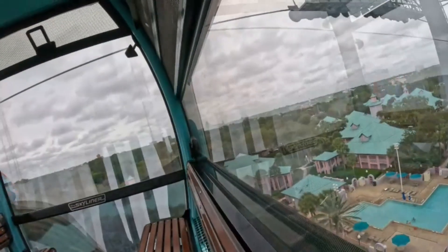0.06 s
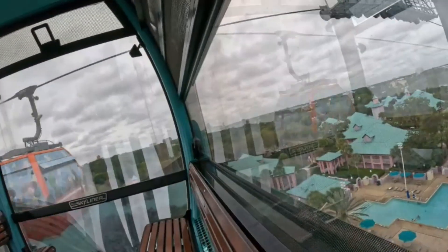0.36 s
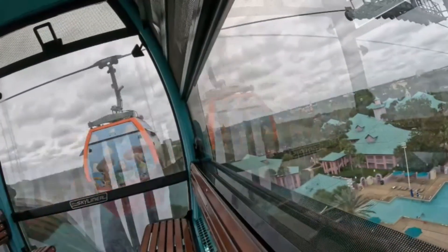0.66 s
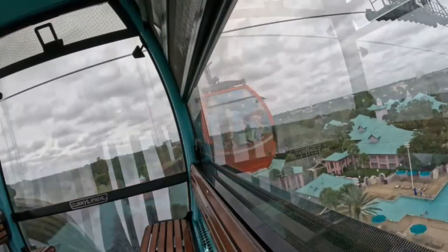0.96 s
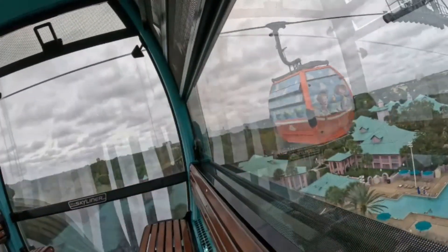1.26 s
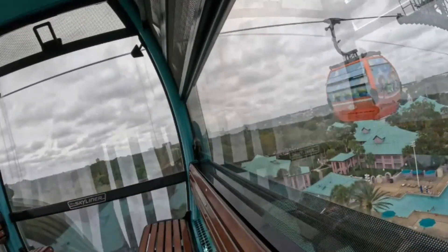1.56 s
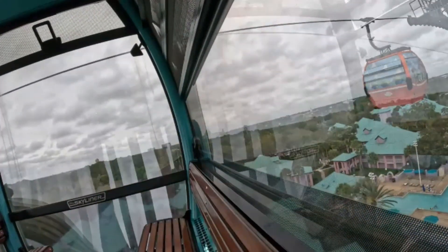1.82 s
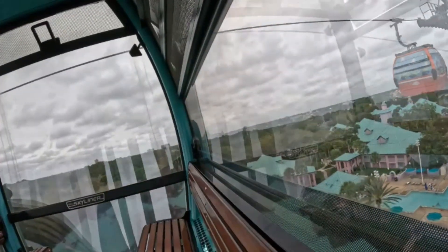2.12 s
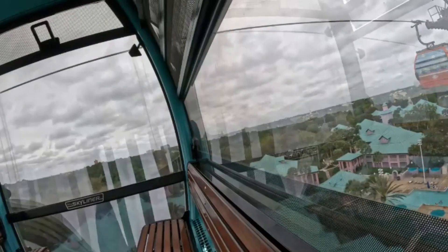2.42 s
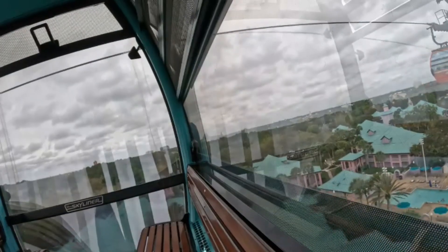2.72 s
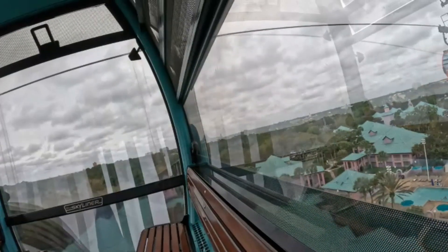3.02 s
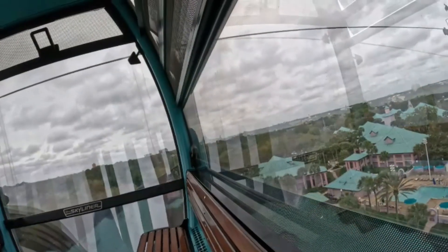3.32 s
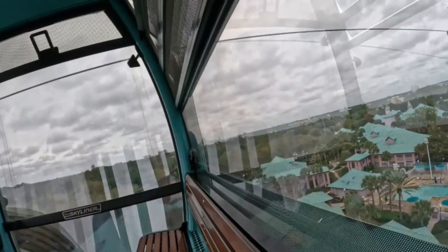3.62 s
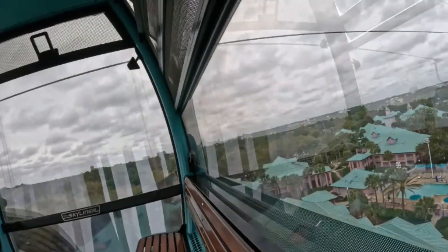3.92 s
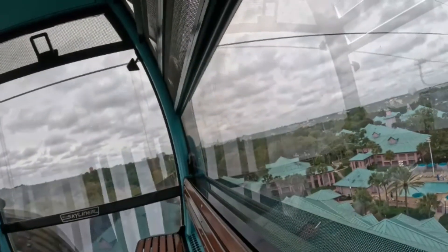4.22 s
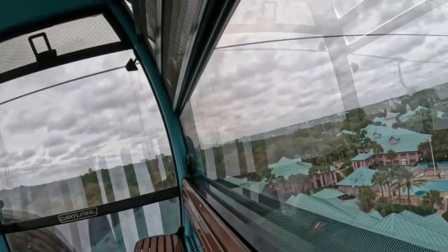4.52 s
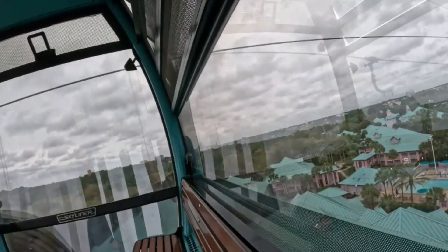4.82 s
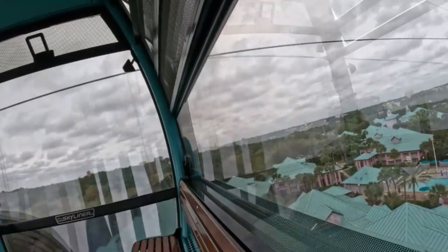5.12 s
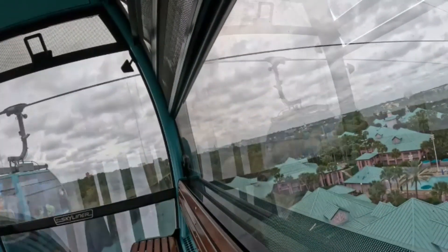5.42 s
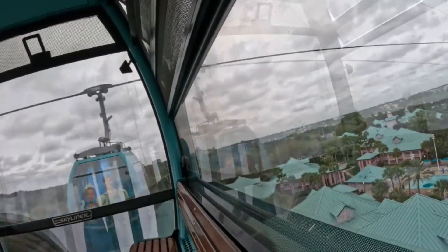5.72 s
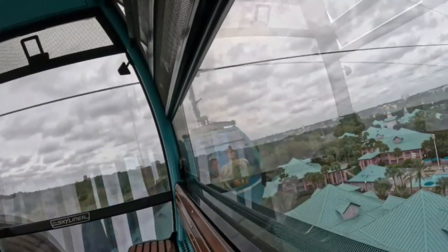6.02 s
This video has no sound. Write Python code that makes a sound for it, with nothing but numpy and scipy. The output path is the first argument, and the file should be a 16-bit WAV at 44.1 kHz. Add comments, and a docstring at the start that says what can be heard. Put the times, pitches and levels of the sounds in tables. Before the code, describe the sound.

Heard from a seat inside a closed cable gondola, a steady deep rumble and swelling hum dominate, with air rushing faintly behind the windows. The shell gives soft, low thumps with tiny ticks in clusters at the beginning, the middle and the end. An oncoming cabin slips by, barely audible, early on. Later a fitting scrapes and squeaks quietly several times, and two very faint whistles come and go.

```python
"""Inside a gliding gondola

The twisted haul rope runs over the sheaves of a receding tower and sends a low, swelling drone down
the hanger. The cabin responds as a resonator: its shell booms and thumps softly, with faint ticks,
and its panels ring. Air rushes outside, another cabin passes, a fitting rubs now and then,
and two faint whistles come and go."""
import sys
import numpy as np
from scipy import signal
from scipy.fft import rfft, irfft
from scipy.io import wavfile

SR = 44100
rng = np.random.default_rng(int(sys.argv[2]) if len(sys.argv) > 2 else 0)


def persist_wave(psi):
    """Save psi, clipped to +-1, as 16-bit WAV."""
    counts = np.round(np.clip(psi, -1, 1) * 32767).astype(np.int16)
    wavfile.write(sys.argv[1], SR, np.atleast_2d(counts).T)


N = 272097
TIME = np.arange(N) / SR
FREQS = np.maximum(np.arange(N // 2 + 1) * SR / N, 1)

# fundamental of the rope's drone: t/s, level/dB
FUNDAMENTAL = [(0.06, -19.5), (0.46, -26), (0.73, -19.5), (2.01, -18.5), (2.51, -27), (2.63, -21),
               (2.94, -20.5), (3.0, -22.5), (3.34, -19.5), (3.56, -25.5), (3.94, -15), (4.28, -27),
               (4.6, -19), (4.95, -21.5), (5.46, -18.5), (5.64, -24.5), (5.9, -17), (6.1, -19.5)]
# its third harmonic: t/s, level/dB
THIRD_HARMONIC = [(0.04, -50.5), (0.85, -40.5), (1.15, -52.5), (1.33, -41.5), (1.6, -35.5), (1.75, -53),
                  (1.88, -42), (2.06, -51.5), (2.5, -41), (2.8, -34.5), (3.0, -41.5), (3.2, -51.5),
                  (3.38, -34), (3.47, -42.5), (3.58, -32.5), (3.7, -50.5), (3.79, -39), (4.2, -51),
                  (4.36, -35.5), (4.54, -48), (4.63, -37), (5.1, -43.5), (5.37, -59), (5.46, -35.5),
                  (5.7, -43.5), (6.12, -41.5)]
# its weak overtones: harmonic number, level/dB
OVERTONES = [(2, -60), (4, -61), (5, -60)]
# dips of the drone at jolts: t/s, half-length/s, fraction lost
STUTTERS = [(0.263, 0.017, 0.77), (0.333, 0.013, .45), (3.055, 0.014, 0.7), (3.213, 0.016, 0.37),
            (5.924, 0.012, 0.4)]
# spectrum of the shell's boom: f/Hz, relative density/dB
BOOM_SPECTRUM = [(8, -19), (18, -1), (30, 1), (62, -6), (80, -6.5), (100, -9), (130, -9.5), (165, -18.5),
                 (230, -24), (400, -46.5)]
# envelope of the panels' vibration: t/s, relative level/dB
PANEL_ENVELOPE = [(0, -35), (.35, -37.5), (.95, -41), (1.45, -40.5), (2.5, -42), (3.6, -43), (4.2, -44),
                  (5.0, -39), (6.1, -44)]
# spectrum of their rumble: f/Hz, relative density/dB
PANEL_SPECTRUM = [(80, -13.5), (140, -1.5), (205, 3), (280, 1), (330, 1), (375, -7), (470, -10),
                  (560, -11.5), (720, -19), (1000, -30), (2000, -41.5)]
# their modes: f/Hz, bandwidth/Hz, level/dB re the envelope
PANEL_MODES = [(203.4, 14, -12.5), (311, 26, -15), (397.6, 6, -13), (426.4, 8, -14), (505, 33, -20),
               (617.7, 11, -21), (747, 61, -23.5)]
# surging hum of one panel: t/s, relative level/dB
PANEL_HUM = [(0, -61), (.16, -41), (.45, -43), (.58, -55), (.72, -37.5), (.9, -55.5), (1.15, -40.5),
             (1.38, -50), (1.55, -43.5), (1.78, -50.5), (1.9, -38.5), (2.1, -48.5), (2.76, -45.5),
             (3.15, -58.5), (3.36, -44.5), (3.62, -46.5), (3.8, -52.5), (4.55, -59), (4.98, -41.5),
             (5.22, -58), (5.64, -46.5), (6.1, -58.5)]
# air along the windows: t/s, relative level/dB
AIR_ENVELOPE = [(0, -59), (.85, -59), (1.9, -60.5), (2.6, -59), (3.2, -56), (4.15, -59.5), (4.55, -57),
                (5.2, -59), (6.1, -57)]
# its spectrum behind the glazing: f/Hz, relative density/dB
AIR_SPECTRUM = [(250, -5), (550, 2.5), (900, 2.5), (1100, 0), (1400, -3.5), (2000, -7.5), (2700, -12),
                (3500, -14.3), (4300, -22), (5200, -24.5), (6800, -30.5), (7600, -36), (8400, -44.5),
                (9200, -66)]
# surges of the vent's resonance: t/s, half-length/s, level/dB
VENT_SURGES = [(2.93, .08, -59), (3.27, 0.08, -58), (3.785, .06, -52.5), (4.365, .04, -54),
               (4.525, .033, -53), (6.0, .17, -60)]
# resonances of the tower's wheels: f/Hz, bandwidth/Hz, relative level/dB
SHEAVE_MODES = [(420.3, 10, -2.5), (475, 42, -4), (657, 130, -8.5)]
# thumps of the shell: t/s, peak level/dB, f/Hz
THUMPS = [(0.102, -19, 109), (0.293, -20, 42), (0.354, -16, 58), (0.44, -25, 45), (0.585, -20, 45.7),
          (1.175, -29, 125), (2.02, -28, 121.5), (2.59, -25.5, 42), (3.041, -15.5, 58), (3.058, -23, 124.6),
          (3.206, -18, 40.2), (3.252, -20, 107.4), (3.298, -24, 44), (3.848, -24.5, 131.6),
          (5.102, -20, 45.3), (5.138, -21.5, 111), (5.298, -21.5, 128.7), (5.771, -23, 44),
          (5.842, -20.5, 50.2), (5.903, -19.5, 124.7), (5.922, -19, 45.2)]
# modes of a thump: frequency ratio, relative level/dB, half-length/cycles
SHELL_MODES = [(1, 1, 0.91), (2.098, -12.5, 1.9)]
# bursts of ticks at some jolts: t/s, half-length/s, gain/dB
TICK_BURSTS = [(.11, .011, -55), (.29, .006, -59), (.35, .012, -63), (3.205, .011, -59), (5.1, .007, -54.5),
               (5.902, 0.012, -56.5)]
# swells of the lower whistle: t/s, half-length/s, level of its tone/dB
LOW_WHISTLE = [(.5, 0.098, -81), (2.02, 0.17, -75.5), (3.05, .22, -76.5), (3.87, 0.16, -73),
               (4.68, 0.2, -68.5)]
# swells of the higher whistle: t/s, half-length/s, level/dB
HIGH_WHISTLE = [(5.13, .08, -78.5), (5.3, .13, -81.5), (5.68, 0.2, -86), (6.08, 0.19, -86)]
# whoosh of the oncoming cabin: f/Hz, bandwidth/Hz, relative level/dB
WHOOSH_BANDS = [(2020, 200, -6), (3570, 410, -8), (4700, 900, -16)]
# rubs of a fitting: t/s, length/s, relative level/dB, squeak/dB re the rub, relative grit level/dB
RUBS = [(2.853, 0.15, -49.5, -2, -70), (3.304, 0.11, -58, -14, -73), (3.702, 0.19, -51, -10.5, -96),
        (4.306, 0.086, -55.5, 0, -79), (4.451, 0.094, -56, 2.5, -77)]
# spectrum of its dry scrape: f/Hz, relative density/dB
SCRAPE_SPECTRUM = [(700, -7), (900, -2.5), (985, 2.5), (1100, 1), (1450, -11), (1800, -3), (2250, -4.5),
                   (2700, -11), (4500, -22), (7000, -36), (8700, -40), (10000, -62)]
# spectrum of the grit as it breaks loose: f/Hz, relative density/dB
GRIT_SPECTRUM = [(2500, -7.5), (5500, 3.5), (7500, -0.5), (9300, -9), (10600, -26), (11700, -14),
                 (13100, -13), (14300, -35)]
# its modes: f/Hz, waver rate/Hz, relative level/dB, rise time as a fraction of the scrape's rise time, extra
# growth/(dB/dB)
SQUEAK_MODES = [(1755, 34, 3, 0.44, 0), (1980, 46, -9.5, 1.0, 1.8), (4990, 140, -15, 0.85, 2)]


def undb(db):
    """Amplitude grows tenfold for every 20 dB."""
    return 10 ** (np.asarray(db) / 20)


def envelope(table):
    """Linear interpolation gives the level in dB at every sample."""
    return np.interp(TIME, *np.transpose(table))


def swell(centre_s, half_s):
    """A Gaussian pulse falls to 1/e one half-length from its centre."""
    return np.exp(-((TIME - centre_s) / half_s) ** 2)


def swells(table):
    """Gaussian pulses superpose into one gain curve."""
    return sum(undb(db) * swell(centre, half) for centre, half, db in table)


def strike(start_s, rise_s):
    """A critically damped response rises quickly to 1 and falls more slowly."""
    age = np.maximum(TIME - start_s, 0) / rise_s
    return age * np.exp(1 - age)


def noise(gain):
    """Filtered white noise takes the filter's spectrum; rms 1."""
    x = irfft(rfft(rng.standard_normal(N)) * gain, N)
    return x / np.std(x)


def coloured(spectrum):
    """Spectral shaping: noise follows the listed points and rolls off beyond them; rms 1."""
    hz, db = np.transpose(spectrum)
    skirts = np.minimum(FREQS / hz[0], 1) * np.minimum(hz[-1] / FREQS, 1) ** 3
    return noise(undb(np.interp(np.log(FREQS), np.log(hz), db)) * skirts)


def ring(hz, width):
    """A randomly driven resonator passes a narrow band; rms 1."""
    return noise(1 / (1 + ((FREQS - hz ** 2 / FREQS) / (1.3 * width)) ** 2))


def resonances(modes):
    """Independently driven modes superpose."""
    return sum(undb(db) * ring(hz, width) for hz, width, db in modes)


def drift(rate_hz):
    """Low-pass noise wanders no faster than about its cutoff; rms 1."""
    return noise(1 / (1 + (FREQS / rate_hz) ** 4))


def whine(hz, waver_rad, rate_hz):
    """Random phase modulation broadens a pure tone; rms 1."""
    return np.sqrt(2) * np.sin(2 * np.pi * hz * TIME + waver_rad * drift(rate_hz))


def rope(strand_hz=80.49, wander_hz=0.3):
    """Periodic forcing: strands bump over the sheaves, giving a near sine with wavering harmonics."""
    phase = 2 * np.pi * np.cumsum(strand_hz + wander_hz * drift(1.21)) / SR
    first = undb(envelope(FUNDAMENTAL) + 0.76 * drift(20)) * np.sin(phase)
    third = undb(envelope(THIRD_HARMONIC) + 2.67 * drift(4.1)) * np.sin(3 * phase + 0.39 * drift(2.8))
    rest = sum(undb(db + 5.3 * drift(4.2)) * np.sin(k * phase + 0.93 * drift(20)) for k, db in OVERTONES)
    dips = sum(lost * swell(centre, half) for centre, half, lost in STUTTERS)
    return np.sqrt(2) * np.clip(1 - dips, 0, 1) * (first + third + rest)


def cabin(hum_hz=338.2):
    """Forced vibration: the shell booms, the panels rumble and ring in their modes, and one hums."""
    boom = undb(-32 + drift(1.5)) * coloured(BOOM_SPECTRUM)
    rumble = undb(-0.5 + 2.2 * drift(6.3)) * coloured(PANEL_SPECTRUM)
    panels = undb(envelope(PANEL_ENVELOPE)) * (rumble + resonances(PANEL_MODES))
    hum = undb(envelope(PANEL_HUM) + 2.5 * drift(9) - 1) * whine(hum_hz, 0.79, 5)
    return boom + panels + hum


def air(vent_hz=977, vent_growth=1.8, reference_db=-58):
    """Flow noise, dulled by the glazing; a vent resonance grows with the flow and surges at times."""
    air_db = envelope(AIR_ENVELOPE)
    rush = undb(air_db + 5 + 0.52 * drift(30)) * coloured(AIR_SPECTRUM)
    vent = undb(-66 + vent_growth * (air_db - reference_db)) * ring(vent_hz, 22)
    surge = undb(-4) * whine(vent_hz, 0.9, 22) + undb(-2.5) * ring(vent_hz, 55)
    return rush + vent + swells(VENT_SURGES) * surge


def tower(start_db=-43, fade_db_per_s=4.5):
    """Attenuation with distance: the ringing of the tower's wheels fades as the cabin draws away."""
    return undb(start_db - fade_db_per_s * TIME) * resonances(SHEAVE_MODES)


def hiss():
    """Narrow-band noise is heard as a thin hiss, dying quickly as the cabin leaves the tower."""
    return undb(-66.5) * swell(0, 0.064) * ring(4320, 240)


def thumps():
    """Heavy damping: a jolt flexes the shell's modes for only a cycle or two."""
    out = np.zeros(N)
    for centre, peak_db, hz in THUMPS:
        for ratio, db, half_cycles in SHELL_MODES:
            mode_hz = ratio * hz
            phase = 2 * np.pi * (mode_hz * (TIME - centre) + rng.random())
            out += undb(peak_db + db) * swell(centre, half_cycles / mode_hz) * np.sin(phase)
    return out


def shudder(relative_db=-14.5, half_s=0.09, fractional_width=0.41):
    """Broad resonance: around each thump the shell shakes loosely near the same frequency."""
    return sum(undb(peak_db + relative_db) * swell(centre, half_s) * ring(hz, fractional_width * hz)
               for centre, peak_db, hz in THUMPS)


def ticks(mean_gap_s=0.004, cutoff_hz=5000, fizz_db=-28.5):
    """Impulses are broadband: high-passed, an irregular train of them chatters over a faint fizz."""
    gaps = mean_gap_s * rng.uniform(0.5, 1.5, size=N // 50)
    onsets = (np.cumsum(gaps) * SR).astype(int)
    clicks = np.bincount(onsets[onsets < N], minlength=N)
    fizz = undb(fizz_db) * rng.standard_normal(N)
    highpass = signal.butter(2, cutoff_hz, "high", fs=SR, output="sos")
    return swells(TICK_BURSTS) * signal.sosfilt(highpass, clicks + fizz)


def whistles(low_hz=3338, high_hz=7175):
    """Narrow bands carry pitch: two faint whistles swell and fade, the lower airy, the higher hissy."""
    low = whine(low_hz, 0.6, 16) + undb(-6) * ring(low_hz, 110)
    return swells(LOW_WHISTLE) * low + swells(HIGH_WHISTLE) * ring(high_hz, 70)


def oncoming_cabin():
    """A passing source swells and fades: a soft whoosh and rough whine, then a briefer, lower whine."""
    whoosh = undb(-61.5) * swell(0.82, 0.12) * resonances(WHOOSH_BANDS)
    nearing = undb(-67.5) * swell(0.83, 0.15) * whine(1955, 1.1, 45)
    leaving = undb(-65) * swell(1.225, 0.08) * whine(1710, 0.8, 35)
    return whoosh + nearing + leaving


def fitting(hard_rub_db=-48.5, grit_rise_s=0.016, roughness_db=1.5):
    """Friction: a fitting breaks loose with grit, scrapes and squeaks; hard slips favour upper modes."""
    scrape, grit = coloured(SCRAPE_SPECTRUM), coloured(GRIT_SPECTRUM)
    tones = [whine(hz, 0.95, rate_hz) for hz, rate_hz, *_ in SQUEAK_MODES]
    out = np.zeros(N)
    for start, length, rub_db, squeak_db, grit_db in RUBS:
        rise_s = length / 4
        out += undb(grit_db) * strike(start, grit_rise_s) * grit
        out += undb(rub_db) * strike(start, rise_s) * scrape
        for (_, _, mode_db, fraction, growth), tone in zip(SQUEAK_MODES, tones):
            tone_db = rub_db + squeak_db + mode_db + growth * (rub_db - hard_rub_db)
            out += undb(tone_db) * strike(start, rise_s * fraction) * tone
    return out * undb(roughness_db * drift(70) - 4)


def scene():
    """Superposition: the pressures of all sources add at a seat in the cabin."""
    steady = rope() + cabin() + air()
    passing = tower() + hiss() + thumps() + shudder() + ticks() + whistles() + oncoming_cabin() + fitting()
    return (steady + passing)[None]


def record(dry, fade_s=0.008, cutoff_hz=15500):
    """Tapering and band limiting: short fades prevent clicks, and a steep low-pass cuts the top."""
    fade = np.clip(np.minimum(TIME, TIME[-1] - TIME) / fade_s, 0, 1)
    lowpass = signal.ellip(8, 0.2, 70, cutoff_hz, fs=SR, output="sos")
    return signal.sosfilt(lowpass, dry * fade)


dry = scene()
out = record(dry)
persist_wave(out)
```